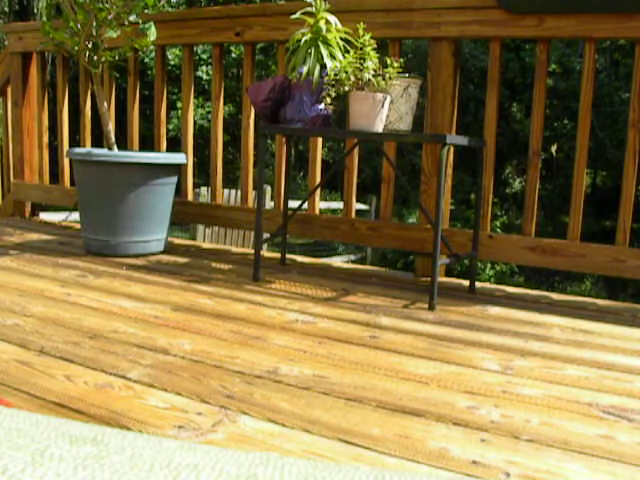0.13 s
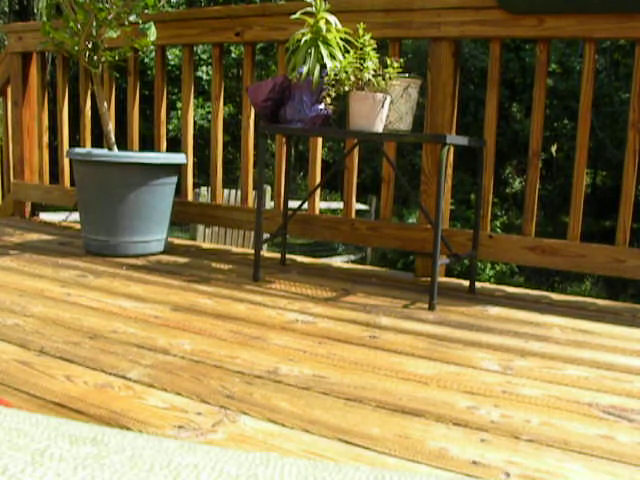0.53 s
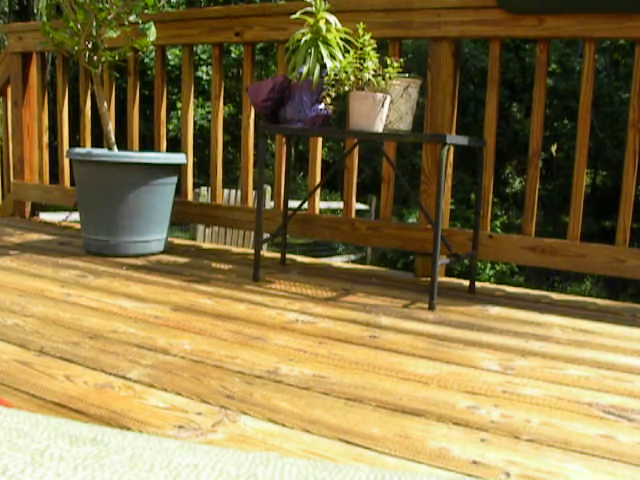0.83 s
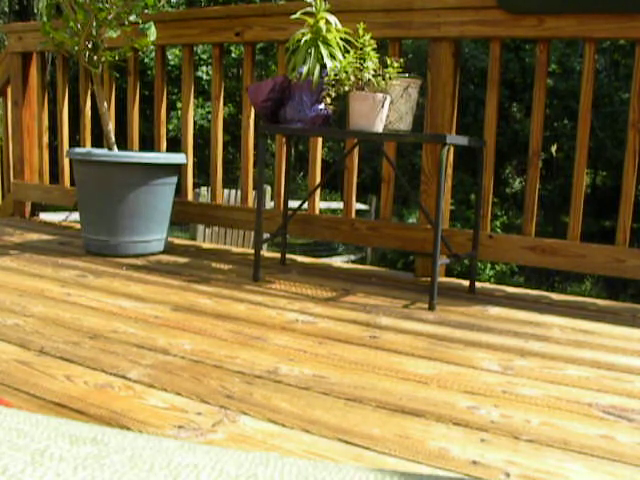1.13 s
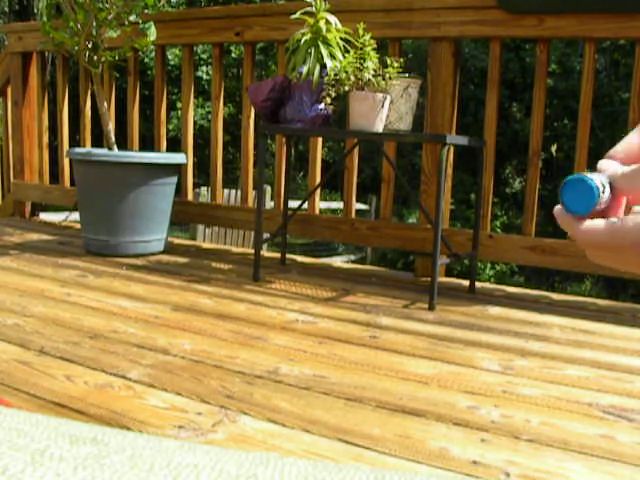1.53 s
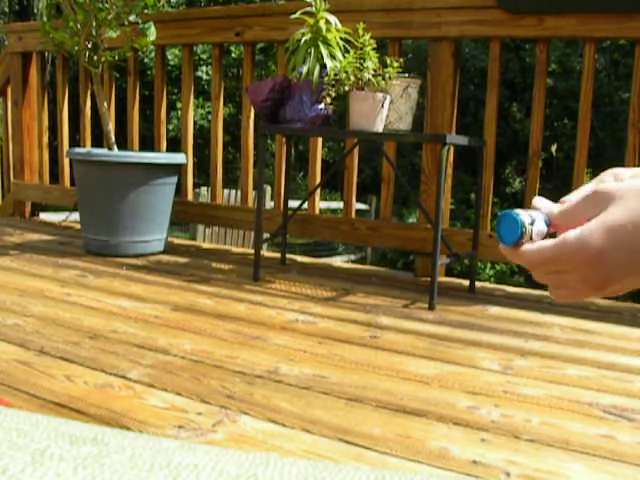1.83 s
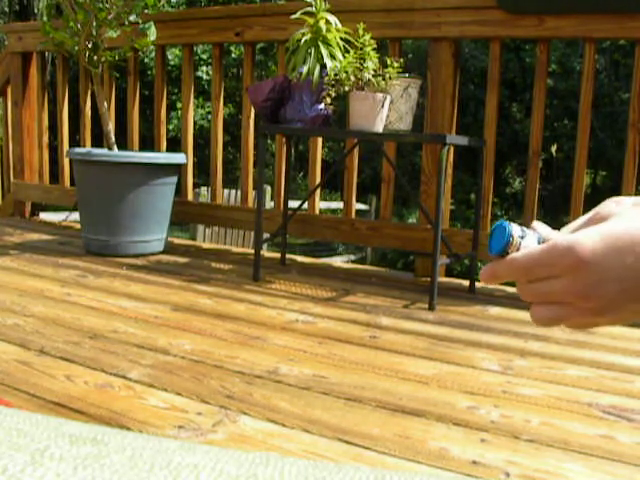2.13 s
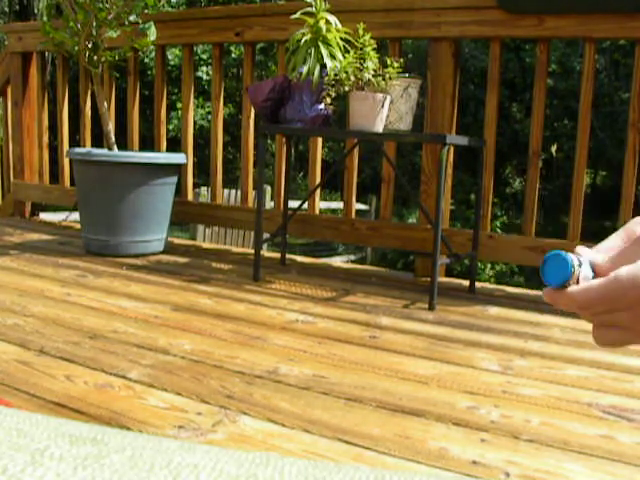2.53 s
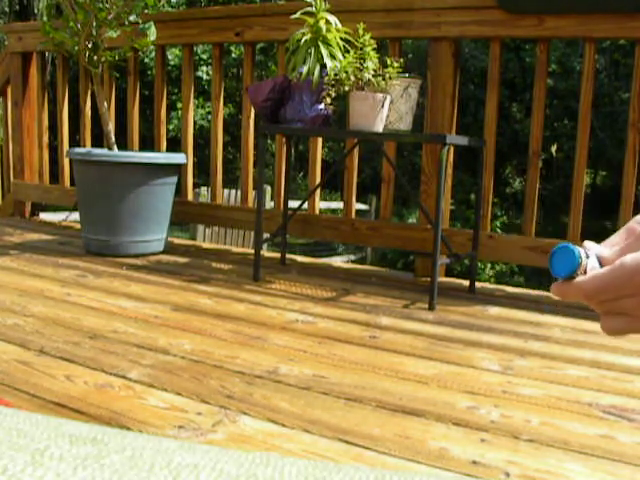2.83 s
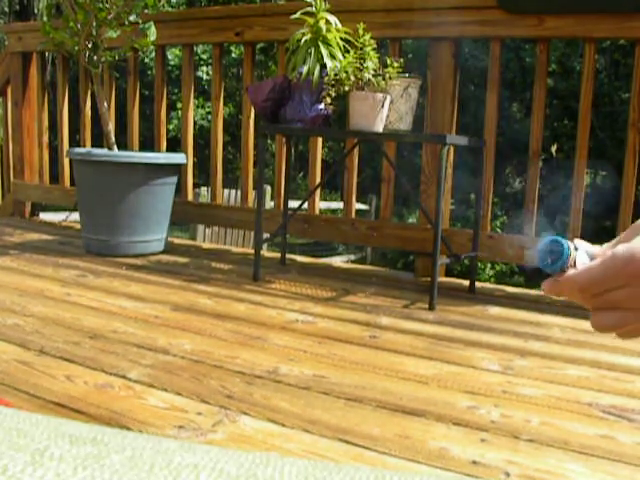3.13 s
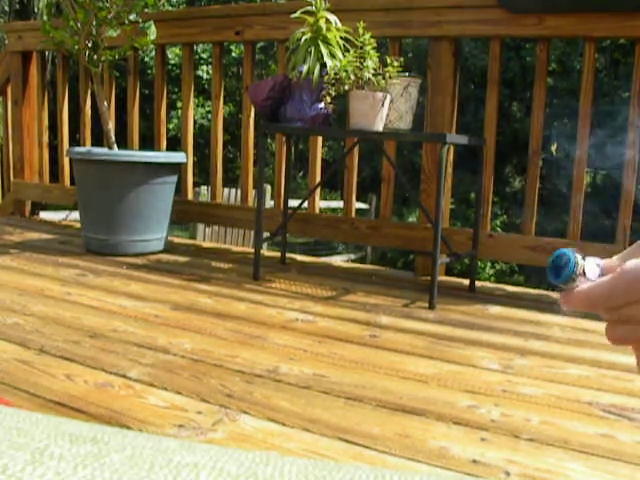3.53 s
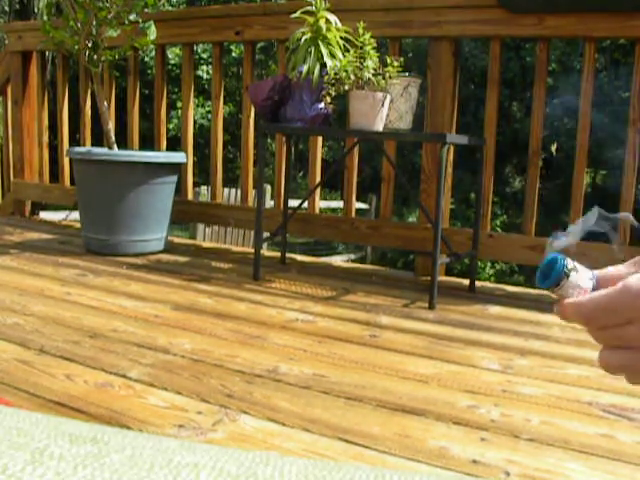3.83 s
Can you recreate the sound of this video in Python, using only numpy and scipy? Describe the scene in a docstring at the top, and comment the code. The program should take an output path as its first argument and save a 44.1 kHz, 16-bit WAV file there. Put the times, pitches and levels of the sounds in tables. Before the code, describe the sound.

Single loud party popper bang on a wooden deck, followed by a rough hiss of echoes.

```python
"""A distant fan unit hums from filtered noise and unsteady sines, and far birds chirp in short falling sines.
Fingers rustle on a wrapper (noise) and the popper clicks in the hand (decaying sines).
Then a party popper goes off on a wooden deck near a small camera: sharp fronts and noise bursts.
The crack overloads it and its gain control ducks; as the gain returns, the echoes from trees
and houses swell up as a grainy hiss, and the popper's card plug lands with a thud."""
import sys
import numpy as np
from scipy import signal
from scipy.fft import rfft, irfft, next_fast_len
from scipy.io import wavfile
from scipy.ndimage import uniform_filter1d, map_coordinates

SR = 44100
rng = np.random.default_rng(int(sys.argv[2]) if len(sys.argv) > 2 else 0)


def dump(signal):
    """Clip the signal to [-1, 1] and save it as 16-bit WAV at the path in sys.argv[1]."""
    limited = np.clip(np.atleast_2d(signal).T, -1, 1)
    pcm = np.round(limited * 32767).astype(np.int16)
    wavfile.write(sys.argv[1], SR, pcm)


def undo_db(level):
    """Turn decibels back into plain size, where 20 dB means ten times bigger."""
    steps = np.asarray(level, float) / 20
    return 10 ** steps


N = 176400
T = np.arange(N) / SR


def unit(x):
    """Scaled to rms 1."""
    return x / np.sqrt(np.mean(x ** 2) + 1e-20)


def along(points, hz):
    """Reads a curve of (Hz, value) points on a log frequency axis."""
    f, v = np.transpose(points)
    return np.interp(np.log(hz + 1), np.log(f + 1), v)


def wobble(rate_hz):
    """A smooth random curve through rate_hz knots a second."""
    knots = rng.standard_normal(int(N * rate_hz / SR) + 4)
    return map_coordinates(knots, [T * rate_hz])


def filtered(x, response):
    """Multiplies the spectrum of x by a response of frequency, without phase shift."""
    size = next_fast_len(N + SR // 4)
    return irfft(rfft(x, size) * response(np.fft.rfftfreq(size, 1 / SR)), size)[:N]


def coloured(x, points):
    """Causal minimum-phase filter of the given spectrum and energy 1, so that sharp fronts stay sharp."""
    spectrum = undo_db(along(points, np.fft.rfftfreq(4096, 1 / SR))) + 1e-4
    cepstrum = irfft(np.log(spectrum))
    # folding the cepstrum forward in time makes the response minimum phase
    cepstrum[1:2048] *= 2
    cepstrum[2049:] = 0
    response = irfft(np.exp(rfft(cepstrum)))
    return signal.fftconvolve(x, response / np.linalg.norm(response))[:N]


def bursts(rows):
    """Envelope of sudden bursts that decay exponentially: rows of (start s, level dB, decay s)."""
    return sum(undo_db(db) * (T >= s) * np.exp(-np.abs(T - s) / decay_s) for s, db, decay_s in rows)


def ring(start_s, level_db, hz, t60_s, attack_s):
    """A struck resonance: a sine with a soft attack that falls 60 dB in t60_s."""
    t = np.clip(T - start_s, 0, 1)
    envelope = undo_db(level_db - 60 * t / t60_s) * (1 - np.exp(-t / attack_s))
    return envelope * np.sin(2 * np.pi * hz * t)


def far_rush():
    """Steady distant rush: shaped noise, patchy in time and frequency, with a slowly wandering level."""
    # colour of the rush: frequency [Hz], relative level [dB per Hz]
    air_colour = [(12, -45.5), (20, -19.5), (27, -20.5), (86, -20), (103, -14), (123, -1), (144, -6.5),
                  (224, -4), (262, -14), (286, -4.5), (357, -7.5), (436, -0.5), (509, -3), (776, -6),
                  (847, -7), (1540, -8), (1720, -9), (3350, -10.5), (4000, -15), (5200, -58), (8800, -120)]
    level_db = -39.5
    z = signal.stft(rng.standard_normal(N), nperseg=512)[2]
    patches = uniform_filter1d(uniform_filter1d(rng.standard_normal(z.shape), 5, 0), 10, 1)
    noise = signal.istft(z * undo_db(1.2 * unit(patches)), nperseg=512)[1][:N]
    rush = unit(filtered(noise, lambda hz: undo_db(along(air_colour, hz))))
    return rush * undo_db(level_db + 0.3 * wobble(3) + 0.5 * wobble(12))


def fan():
    """The fan unit: a fuzzy noise band and hum lines that waver in level and phase."""
    # hum lines: pitch_hz [Hz], level_db [dB, relative between lines]
    hum_lines = [(118.4, -57), (236.9, -59.5), (296.1, -61.5), (452.2, -57), (829.0, -56), (947.5, -54.5)]
    centre_hz, width_hz, drone_db = 459.5, 94, -51.5
    band = filtered(rng.standard_normal(N), lambda hz: np.exp(-((hz - centre_hz) / width_hz) ** 2))
    drone = unit(band) * undo_db(drone_db + 2.94 * wobble(4))
    hum = np.zeros(N)
    for pitch_hz, level_db in hum_lines:
        level = undo_db(level_db + 1.5 + 1.6 * wobble(8.6))
        hum += level * np.sin(2 * np.pi * pitch_hz * T + 0.16 * wobble(6))
    return drone + hum


def birds():
    """Short hoarse falling whistles, each smeared by the foliage into a decaying noise tail."""
    # chirps: start_s [s], level_db [dB, relative between chirps], start pitch_hz [Hz]
    chirps = [(.01, -52.5, 3600), (.115, -47, 3696), (.335, -47.5, 3710), (0.559, -49, 3666),
              (.885, -50, 3700), (1.155, -52, 3686), (1.449, -51, 3600), (1.73, -50, 3760),
              (1.8, -47, 3636), (2.295, -53, 3584)]
    length_s, fall_hz_per_s, tail_decay_s = 0.04, 22000, 0.014
    out = np.zeros(N + SR)
    t = T[:int(length_s * SR)]
    for start_s, level_db, pitch_hz in chirps:
        sweep = np.sin(2 * np.pi * (pitch_hz * t - fall_hz_per_s * t ** 2 / 2))
        tone = sweep * np.sin(np.pi * t / length_s)
        hoarse = 1 + 0.78 * unit(uniform_filter1d(rng.standard_normal(len(t)), 90))
        smear = 2.5 / 16 * rng.standard_normal(2048) * np.exp(-T[:2048] / tail_decay_s)
        smear[0] = 1  # the direct sound
        chirp = signal.fftconvolve(tone * hoarse, smear)
        out[int(start_s * SR):][:len(chirp)] += undo_db(level_db - 2) * chirp
    return out[:N]


def wrapper_rustle():
    """Fingers on the wrapper: a brief bell-shaped swell of band noise."""
    centre_s, length_s, level_db, centre_hz = 1.571, 0.017, -40, 3500
    noise = rng.standard_normal(N)
    paper = unit(filtered(noise, lambda hz: np.exp(-((hz - centre_hz) / 600) ** 2)))
    return undo_db(level_db) * np.exp(-((T - centre_s) / length_s) ** 2) * paper


def hand_click():
    """The popper clicks in the hand: three short resonances struck together."""
    return sum(ring(1.5765, -22.5, hz, t60_s=0.012, attack_s=0.0006) for hz in (2090, 2800, 3390))


def popper():
    """Each arrival of the blast is a sharp front and a noise burst; a pre-echo hiss rises up to the first."""
    # direct blast and its bounces off deck, railing and wall:
    # start_s [s], level_db [dB before colouring], decay_s [s]
    arrivals = [(3.2031, -9, 0.00068), (3.2045, 1.5, 0.0017), (3.205, -1, 0.0011), (3.208, -5.5, 0.0012),
                (3.2118, -1, 0.0027), (3.22, -10, 0.0043), (3.23, -13.5, 0.0044)]
    # colour of the crack: frequency [Hz], relative level [dB per Hz]
    crack_colour = [(40, -40.5), (150, -24), (400, -20.5), (700, -11), (1100, -15), (1450, -5.5),
                    (2020, -1), (2280, 0), (2600, -9), (3100, -6.5), (3400, -5.5), (3750, -8.5),
                    (4000, -10.5), (5200, -45), (8800, -120)]
    pre_echo_end_s, pre_echo_db, pre_echo_rise_s = 3.2026, -19, 0.008
    front_db = 12.5  # front over its noise burst
    rise = np.exp(-np.abs(T - pre_echo_end_s) / pre_echo_rise_s)
    pre_echo = undo_db(pre_echo_db) * (T < pre_echo_end_s) * rise
    drive = (bursts(arrivals) + pre_echo) * np.sign(rng.standard_normal(N))
    for start_s, level_db, _ in arrivals:
        drive[int(start_s * SR)] = undo_db(level_db + front_db)
    return coloured(drive, crack_colour)


def echoes():
    """Scattered blast: many small grains on a smooth noise wash, and a few strong slaps with sharp fronts."""
    # fading of the wash: time_s [s], level_db [dB before colouring]
    wash_fade = [(3.22, -16.5), (3.26, -23.5), (3.29, -19.5), (3.33, -18), (3.37, -21), (3.42, -20),
                 (3.48, -22), (3.55, -28), (3.62, -31), (3.7, -34.5), (3.8, -39.5), (4, -49.5)]
    # single strong echoes: start_s [s], level_db [dB, relative between slaps]
    slap_rows = [(3.3534, -16), (3.3877, -15.5), (3.4044, -8.5), (3.4354, -18.5), (3.4464, -13),
                 (3.46, -19.5), (3.5469, -9.5)]
    # colour of the echoes: frequency [Hz], relative level [dB per Hz]
    far_colour = [(180, -55), (300, -25), (415, -18), (458, -18), (600, -21), (887, -16.5), (1050, -29.5),
                  (1150, -20.5), (1570, -8), (2250, 2.5), (2680, -14), (3330, -6.5), (4000, -10),
                  (5200, -46.5), (8800, -120)]
    grains_per_s, grain_decay_s, grain_spread_db, grain_share = 700, 0.002, 2, 0.42
    burst_db, front_db, slap_decay_s = -6, 9, 0.003  # burst and front against the slap's level_db
    level = undo_db(np.interp(T, *np.transpose(wash_fade), left=-120))
    hits = (rng.random(N) < grains_per_s / SR) * undo_db(grain_spread_db * rng.standard_normal(N))
    grains = signal.fftconvolve(hits, np.exp(-T[:2048] / grain_decay_s))[:N]
    wash = level * (1 - grain_share + grain_share * unit(grains))
    slaps = bursts([(s, db + burst_db, slap_decay_s) for s, db in slap_rows])
    drive = wash * rng.standard_normal(N) + slaps * np.sign(rng.standard_normal(N))
    for start_s, level_db in slap_rows:
        drive[int(start_s * SR)] += undo_db(level_db + front_db)
    return coloured(drive, far_colour)


def plug_thud():
    """The card plug lands on the boards: one low, damped resonance."""
    return ring(3.461, -24, 480, t60_s=0.06, attack_s=0.0015)


def scene():
    """All layers summed: ambience, handling sounds and the blast."""
    ambience = far_rush() + fan() + birds()
    handling = wrapper_rustle() + hand_click()
    blast = popper() + echoes() + plug_thud()
    return (ambience + handling + blast)[None]


def gain_control(x):
    """A loud peak ducks the gain after a lag; it holds, then climbs back at a steady dB rate."""
    trigger_db, depth_db = -4, 13
    lag_s, hold_s, return_db_per_s = 0.0098, 0.062, 129.5
    # from 0 at the trigger to 1 at 2 dB above it
    over = np.clip((20 * np.log10(np.abs(x) + 1e-9) - trigger_db) / 2, 0, 1)
    # each peak starts a falling line of duck depth; the highest line so far wins
    lines = np.where(over > 0, depth_db * over + return_db_per_s * (T + hold_s), 0)
    back_db = np.maximum.accumulate(lines) - return_db_per_s * T
    duck_db = uniform_filter1d(np.clip(back_db, 0, depth_db), int(lag_s * SR))
    return x * undo_db(-np.interp(T - lag_s, T, duck_db))


def band_limit(x):
    """A steep low-pass at the top of the band."""
    return signal.sosfilt(signal.butter(12, 15800, fs=SR, output="sos"), x)


def record(dry):
    """Gain control, overload, bass cut, a low sampling rate whose mirror image leaks past half, clipping."""
    # replay filter: frequency [Hz], gain [dB]
    replay_filter = [(3700, -0.5), (4000, -6.5), (4300, -18.5), (4600, -50), (4800, -120)]
    rate_hz, ceiling, clip, offset = 8000, 0.7, 0.72, -0.0028  # levels against full scale 1
    bass_hz, bass_loss = 60, 0.37  # share of the deepest bass lost in the input coupling
    overloaded = ceiling * np.tanh(gain_control(dry[0]) / ceiling)
    x = filtered(overloaded, lambda hz: hz < rate_hz / 2)
    x = x - filtered(np.clip(x, -clip, clip), lambda hz: bass_loss * (hz < bass_hz))
    # the cosine adds the mirror images around the sampling rate
    mirrored = x * (1 + 2 * np.cos(2 * np.pi * rate_hz * T))
    replayed = filtered(mirrored, lambda hz: undo_db(along(replay_filter, hz)))
    mix = (np.clip(replayed, -clip, clip) + offset)[None]
    return band_limit(mix)


dry = scene()
out = record(dry)
dump(out)
```